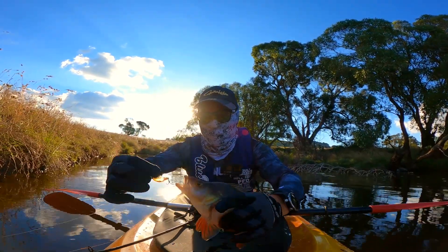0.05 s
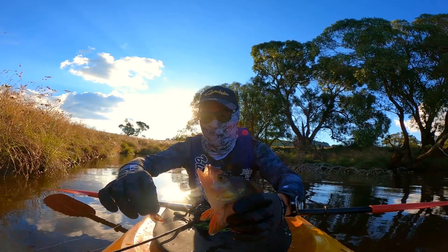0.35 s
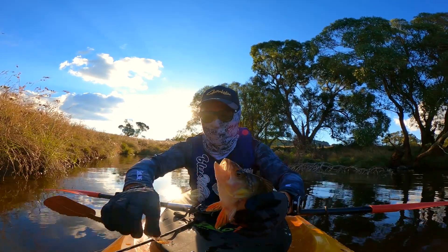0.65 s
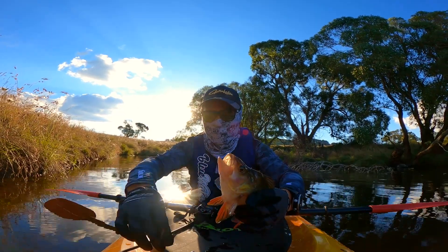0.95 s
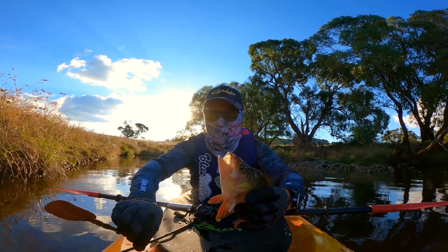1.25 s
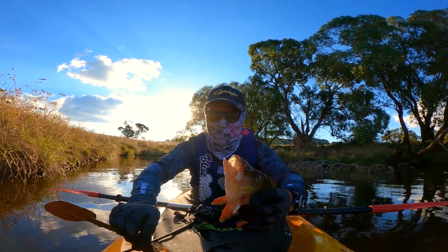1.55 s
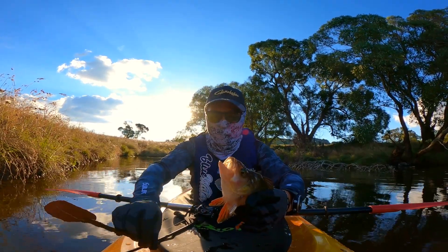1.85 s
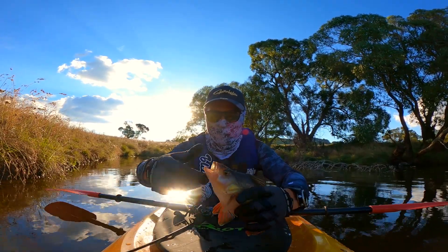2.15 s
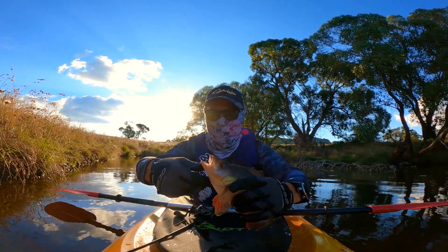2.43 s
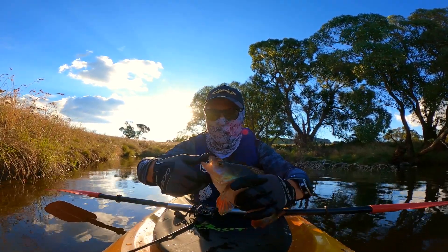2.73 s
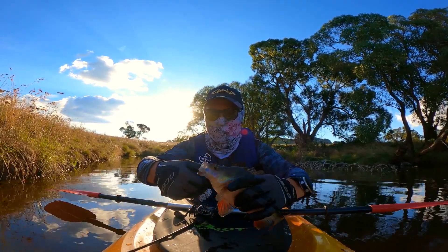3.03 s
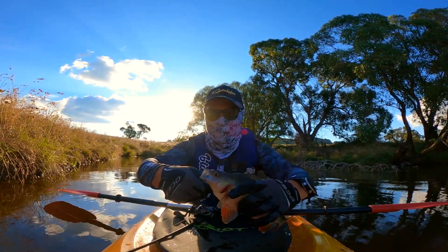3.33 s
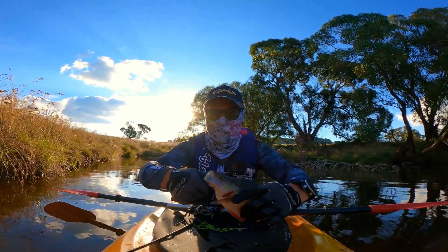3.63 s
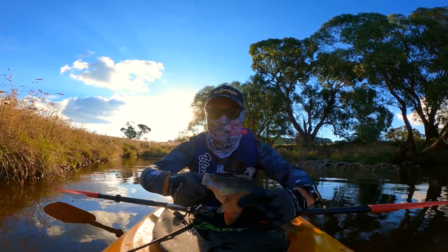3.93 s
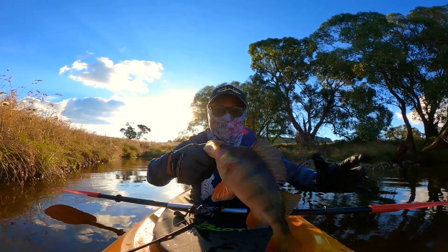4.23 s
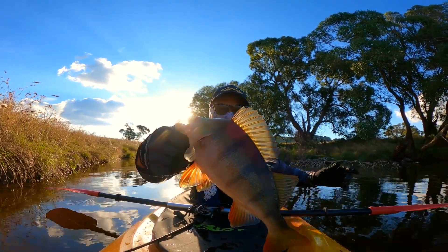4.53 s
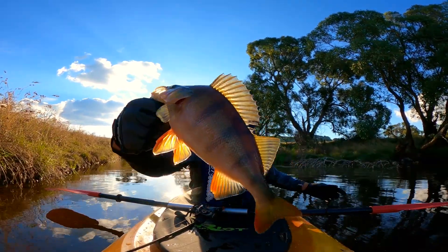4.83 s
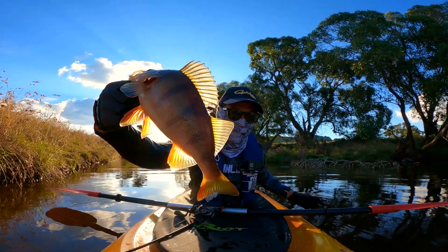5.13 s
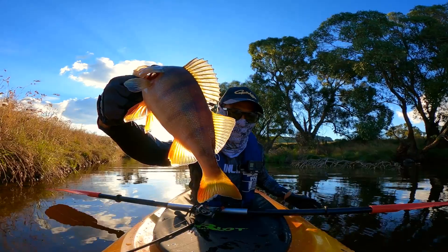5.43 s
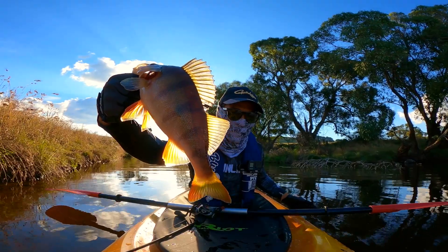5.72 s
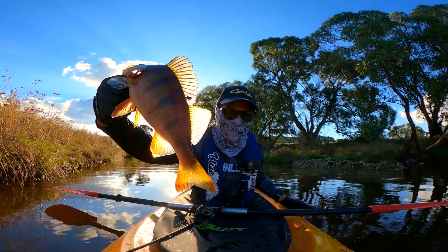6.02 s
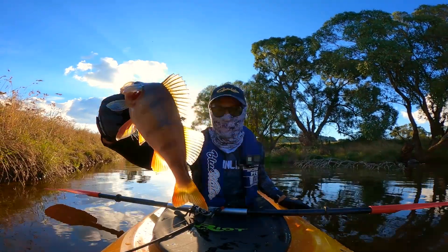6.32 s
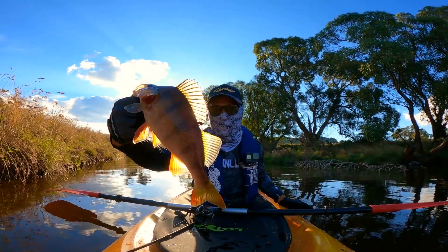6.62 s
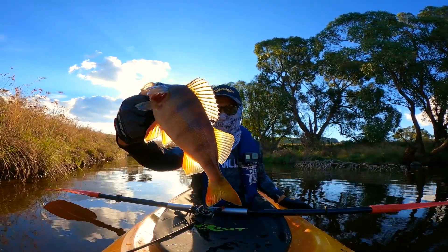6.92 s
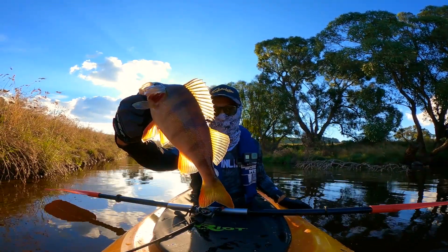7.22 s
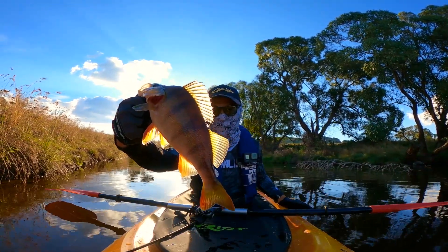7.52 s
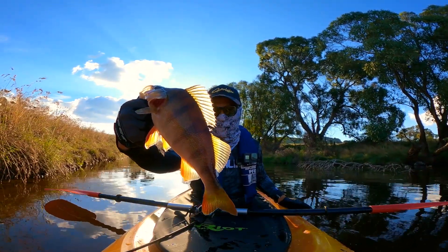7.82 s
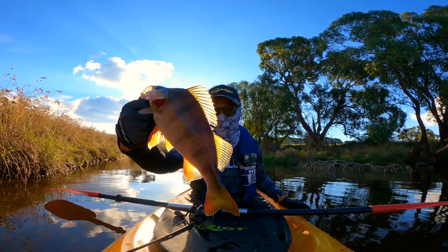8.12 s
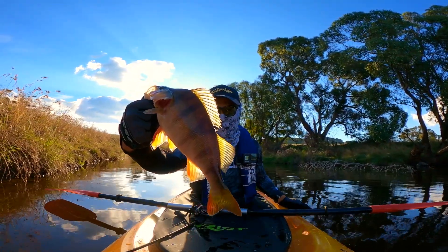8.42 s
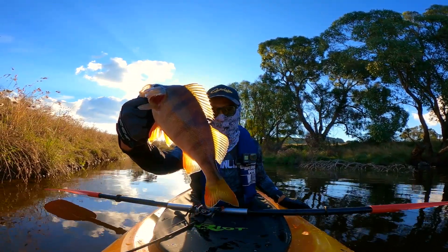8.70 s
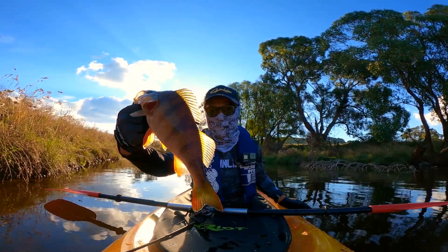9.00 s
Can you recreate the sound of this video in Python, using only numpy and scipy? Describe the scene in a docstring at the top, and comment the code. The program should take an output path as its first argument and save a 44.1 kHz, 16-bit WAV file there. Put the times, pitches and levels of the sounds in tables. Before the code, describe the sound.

An angler unhooks a fish in a plastic kayak, heard from close up. Small tackle ticks and wet glove rubs lead into a sharp, ringing clatter of pliers on the hull. After some faint squeaks, the fish slaps the deck with a deep hollow thump. The rest is quiet: cloth rustle and soft bumps. Thin, rising insect trills and a faint rumble continue outdoors throughout.

```python
"""On a still creek, insects trill in rising phrases over a low distant rumble, from start to end.
An angler in a plastic kayak sorts the tackle: hooks tick, and wet gloves scrape and squeak.
Just after one second, pliers bounce on the hollow hull and set it ringing.
Near four seconds the fish being unhooked kicks, slapping and thumping the boat; a glove groans on it.
Sleeves rustle as the fish is held up, and a few more soft bumps come near the end."""
import sys
import numpy as np
from scipy import signal
from scipy.fft import rfft, irfft, next_fast_len
from scipy.io import wavfile
from scipy.ndimage import map_coordinates

SR = 44100
rng = np.random.default_rng(int(sys.argv[2]) if len(sys.argv) > 2 else 0)


def digitize_waveform(pressure):
    """Quantize a signal to 16-bit integers and store it at the path in sys.argv[1].

    Rows of a 2-D input are taken as channels; values are limited to [-1, 1].
    """
    field = np.atleast_2d(pressure).T
    bounded = np.clip(field, -1, 1)
    quanta = np.round(bounded * 32767).astype(np.int16)
    wavfile.write(sys.argv[1], SR, quanta)


N = 399546
TIME = np.arange(N) / SR

# the open air: (time [s], rumble level [dB], insect chorus level [dB])
AIR_LEVELS = [(0, -63.5, -59), (1.2, -60.5, -57.5), (2.1, -66.5, -65.5), (3.5, -67, -63), (4.9, -66, -63),
              (5.6, -63, -59.5), (6.4, -63, -61.5), (7.8, -62.5, -59), (9.06, -61, -60)]
# the tone of a wet rub or snap: (frequency [Hz], level [dB])
WET_TONE = [(100, -15), (400, -6.5), (750, -12.5), (1200, -0.5), (1900, -0.5), (2700, -0.5), (4500, -8),
            (6500, -11), (10000, -20), (15000, -35.5)]
# pliers hit the hull: (time [s], level [dB], bass [dB], treble [dB], pitch [Hz], loss per bounce [dB])
PLIER_KNOCKS = [(1.2771, 6.5, 0, 4.5, 4473, 26), (1.2965, 7.5, -5, 2, 1775, 19),
                (1.3026, 6.5, 6.5, -1.5, 3760, 9), (1.3098, 1, 6, -12, 1470, 7.5),
                (1.4055, 6, 2.5, 6, 3720, 30), (1.4314, 6.5, 5.5, 4.5, 1770, 14.5),
                (1.5299, 0, 2, 3, 2413, 10.5), (1.5447, -1, 1, -3, 3560, 9), (1.7017, 1, 3, 7, 3720, 14),
                (1.7146, -2, 5.5, -2, 2030, 16.5), (1.7229, 7.5, -1, -16.5, 1190, 28.5),
                (1.7629, 9, -4, -8.5, 2790, 31.5), (1.7682, 8.5, -6.5, -16, 1730, 32.5),
                (1.8322, 5.5, -5, -21, 1700, 32)]


def amp(db):
    """Turn decibels into a number to multiply by."""
    return 10 ** (np.asarray(db) / 20)


def unit(x):
    """Scale a sound to an average (rms) size of 1."""
    return x / np.sqrt(np.mean(x ** 2) + 1e-20)


def along(points, hz):
    """Read between (frequency, value) points, with every octave equally wide."""
    freqs, values = np.transpose(points)
    return np.interp(np.log(hz + 1), np.log(freqs), values)


def air_gain(column):
    """Gain over time for the rumble (column 1) or the insect chorus (column 2)."""
    rows = np.array(AIR_LEVELS)
    return amp(np.interp(TIME, rows[:, 0], rows[:, column], left=-120, right=-120))


def wobble(rate):
    """A smooth random curve that takes `rate` new values a second."""
    return map_coordinates(rng.standard_normal(int(N * rate / SR) + 4), [TIME * rate])


def swells(rows):
    """Bell-shaped rises in gain, from rows of (time [s], level [dB], half length [s])."""
    s, db, half = np.transpose(rows)
    grid = TIME[::64, None]
    bells = amp(db) * np.exp(-.5 * ((grid - s) / half) ** 2)
    return np.interp(TIME, grid[:, 0], bells.sum(axis=1))


def colour(x, gain_db):
    """Change the tone of x by gain_db(frequency)."""
    n = x.shape[-1]
    size = 2 * next_fast_len(n // 2 + 2048)
    cepstrum = irfft(np.log(amp(gain_db(np.fft.rfftfreq(size, 1 / SR)))))
    # this fold makes the filter ring only after a sound, never before it
    cepstrum[1:size // 2] *= 2
    cepstrum[size // 2 + 1:] = 0
    return irfft(rfft(x, size) * np.exp(rfft(cepstrum)), size)[..., :n]


def shape(x, tone):
    """Give x a tone listed as (frequency [Hz], level [dB])."""
    return colour(x, lambda hz: along(tone, hz))


def spread(pair, side_db):
    """Two unrelated signals become the centre and the width of a stereo sound."""
    side = amp(side_db) * pair[1]
    return np.array([pair[0] + side, pair[0] - side])


def add(out, s, x):
    """Mix x into out, starting at s seconds."""
    i = round(s * SR)
    x = x[..., max(-i, 0):max(N - i, 0)]
    out[:, max(i, 0):max(i, 0) + x.shape[-1]] += x


def hiss(tone):
    """Outdoor noise, more alike in the two ears at low pitches than at the very top."""
    # (frequency [Hz], left-right likeness [0 to 1])
    likeness = [(60, 0.74), (130, 0.6), (290, 0.69), (640, 0.51), (1410, 0.72), (3100, 0.47), (6820, 0.04),
                (15000, 0.1)]
    centre, width = rng.standard_normal((2, N))
    width = colour(width, lambda hz: 10 * np.log10((1 - along(likeness, hz)) / (1 + along(likeness, hz))))
    return unit(shape(spread([centre, width], 0), tone))


def friction(tone, grit_db, side_db):
    """Rubbing noise: countless tiny slips of uneven strength."""
    slips = rng.standard_normal((2, N)) * amp(grit_db * wobble(700) + 1.5 * wobble(60))
    return unit(shape(spread(slips, side_db), tone))


def creek(rumble_db=2.5, breeze_db=-72, rocking_db=-77):
    """Distant rumble and faint hiss of the open air, and the boat's slow rocking."""
    # three tones: (frequency [Hz], level [dB])
    rumble_tone = [(20, -14), (55, -8), (95, -27), (140, 3), (230, 3.5), (330, -8), (480, -15.5),
                   (750, -27), (1200, -25.5), (2500, -39.5), (8000, -71.5)]
    breeze_tone = [(300, -11.5), (750, -7.5), (1250, 1.5), (2000, -6.5), (3500, -10.5), (6500, -10.5),
                   (10000, -31), (13500, -14), (16000, -17.5)]
    boat_tone = [(15, -4.5), (30, -2), (50, -1.5), (90, -19.5), (300, -60.5), (1000, -100)]
    # the boat lurches as the weight shifts: (time [s], level [dB], half length [s])
    lurches = [(2.3, -67, .25), (3.15, -60.5, 0.046), (3.31, -52.5, 0.04), (3.53, -58, .04),
               (3.85, -42, 0.13), (4.52, -60, 0.046), (4.92, -53, 0.032)]
    rumble = air_gain(1) * amp(rumble_db + 1.2 * wobble(5)) * hiss(rumble_tone)
    breeze = amp(breeze_db + .5 * wobble(4.9)) * hiss(breeze_tone)
    rocking = amp(rocking_db + 3 * wobble(4.1)) + swells(lurches)
    return rumble + breeze + rocking * friction(boat_tone, grit_db=1, side_db=-20.5)


def trill(length_s, first_hz, last_hz, period_s=.0363, rise_hz=750, fall_hz=1400, sounding_share=.45):
    """One insect's run of chirps: each wing stroke arches in pitch, and the whole run climbs."""
    t = np.arange(int((length_s + period_s) * SR)) / SR
    stroke, within = np.divmod(t / period_s, 1)
    within = np.minimum(within / sounding_share, 1)  # 0 to 1 through each chirp
    chance = rng.standard_normal((32, 2))[stroke.astype(int)]
    progress = np.minimum(stroke * period_s / length_s, 1)
    arch = np.where(within < .5, rise_hz, fall_hz) * (2 * within - 1) ** 2 * (.45 + .86 * progress)
    hz = first_hz + (last_hz - first_hz) * np.sin(np.pi / 2 * progress) - arch + 45 * chance[:, 0]
    loudness = amp(.39 * chance[:, 1] - 1.8 * (stroke == 0)) * np.abs(np.sin(np.pi * within)) ** .5
    fade = np.clip((t[-1] - t) / .005, 0, 1)
    return fade * loudness * np.sin(2 * np.pi * np.cumsum(hz) / SR)


def insects(ceiling_hz=9010, climb_share=.44, echo_db=-12, far_db=-2, wash_db=-7.5, far_count=110):
    """Near phrases, a crowd of far ones from all sides, and their blur among the reeds."""
    # near phrases: (time [s], level [dB], first pitch [Hz])
    phrases = [(-.146, -46, 7630), (0.325, -47, 7720), (0.751, -49, 7540), (.92, -60, 8400),
               (1.206, -51, 7500), (1.714, -52.5, 7430), (2.19, -59.5, 7500), (2.69, -58, 7600),
               (3.61, -56.5, 7400), (4.074, -55.5, 7600), (4.58, -54, 7510), (4.9, -60, 8360),
               (5.046, -53, 7500), (5.509, -53, 7570), (6.011, -50.5, 7540), (6.026, -60.5, 8550),
               (6.469, -50.5, 7500), (6.94, -50, 7380), (7.159, -64.5, 8130), (7.473, -50, 7360),
               (7.98, -50.5, 7460), (8.141, -56, 8450), (8.48, -50, 7360), (8.938, -49, 7550)]
    # the blurred chorus: (frequency [Hz], level [dB])
    chorus_tone = [(5500, -51), (6800, -19.5), (7450, -1), (8200, -5), (8700, -10), (9300, -31.5),
                   (11000, -60)]
    near, far = np.zeros((2, N)), np.zeros((2, N))
    for s, db, first_hz in phrases:
        song = amp(db) * trill(.22, first_hz, first_hz + climb_share * (ceiling_hz - first_hz))
        add(near, s, np.array([np.roll(song, 1), song]))
    for k, (jitter, pitch, side) in enumerate(rng.uniform(-1, 1, (far_count, 3))):
        song = trill(.29, 7650 + 300 * pitch, 8300 + 300 * pitch)
        add(far, (k + jitter - .5) * N / SR / far_count, np.array([np.roll(song, round(3 * side)), song]))
    direct = near + air_gain(2) * amp(far_db) * unit(far)
    t = np.arange(SR // 4) / SR
    tail = rng.standard_normal((2, len(t))) * amp(-60 * t / .073)
    echo = signal.fftconvolve(direct, tail / np.linalg.norm(tail[0]), axes=1)[:, :N]
    return direct + amp(echo_db) * echo + amp(wash_db) * air_gain(2) * hiss(chorus_tone)


def thumps(puff_db=3.5, even_swell_s=.013, softening_db=5, lag_s=.00077):
    """Soft blows swell into the hollow hull's deepest notes, with a dull puff."""
    # (time [s], level [dB], swell time [s])
    blows = [(0.01, -51, 0.016), (0.301, -53.5, 0.023), (1.305, -44, 0.0022), (1.438, -29, 0.014),
             (1.46, -34, 0.0039), (1.726, -40, 0.006), (1.94, -42.5, 0.029), (2.668, -54.5, 0.0047),
             (3.626, -26.5, 0.01), (3.779, -16, 0.013), (3.857, -38, 0.0058), (4.519, -47.5, 0.014),
             (4.93, -65, 0.042), (7.059, -40, .025), (7.797, -32.5, 0.035)]
    # (pitch [Hz], level [dB], time to fade by 60 dB [s])
    hull_notes = [(78.4, -0.5, .19), (120, -10, .22), (159, -11, .18), (205, -12, 0.11), (265, -21, 0.064)]
    # (frequency [Hz], level [dB])
    puff_tone = [(40, -3), (220, 2), (480, -10), (850, -18), (1600, -26), (5000, -57)]
    out, t = np.zeros((2, N)), np.arange(-SR // 5, SR // 2) / SR
    for s, db, swell in blows:
        overtone_db = -softening_db * np.log2(swell / even_swell_s)  # slower blows sound duller
        rise, after = np.exp(np.minimum(t, 0) / swell), np.maximum(t, 0)
        deep, *upper = [-amp(note_db - 60 * after / fade_s)
                        * np.sin(2 * np.pi * hz * rng.normal(1, .019) * t)
                        for hz, note_db, fade_s in hull_notes]
        ring = deep + amp(overtone_db) * sum(upper) * np.array([[1.15], [.85]])
        ring[1] = np.roll(ring[1], round(lag_s * SR))  # the hull's two sides swing slightly out of step
        noise = spread(rng.standard_normal((2, len(t))), side_db=-9)
        puff = shape(noise * rise * amp(puff_db + overtone_db - 60 * after / .09), puff_tone)
        add(out, s + t[0], amp(db) * (rise * ring + puff))
    return out


def gloves(skid_delay_s=.024, skid_half_s=.0091, skid_db=-38.5):
    """Wet gloves scrape on fish and gear; bouncing pliers skid a little."""
    # (time [s], level [dB], half length [s], extra bright edge [dB])
    strokes = [(0.025, -49, 0.028, -1), (0.125, -63, .007, 7.5), (0.2, -61.5, 0.048, -1),
               (0.488, -72.5, 0.2, -6), (0.821, -61.5, 0.015, 9), (0.893, -50.5, .012, 11),
               (0.94, -62, 0.021, 0.5), (1.225, -65, 0.057, 6.5), (1.385, -49, .02, 0),
               (1.48, -64, 0.062, 3), (1.663, -52.5, .03, 1), (2.616, -79.5, .05, 8.5),
               (3.433, -69.5, 0.032, 10.5), (3.557, -58, 0.031, 0), (3.63, -43.5, 0.015, -9),
               (3.71, -44.5, 0.021, -13), (3.778, -47, 0.02, -4), (3.852, -64, 0.04, -10),
               (4.117, -60.5, 0.027, -18), (6.777, -76, 0.055, 10)]
    rub = friction(WET_TONE, grit_db=4, side_db=-9)
    edge = shape(rub, [(1500, -30), (4000, 2.5), (12000, -1)])
    rub_gain = swells([(s, db, half) for s, db, half, _ in strokes])
    edge_gain = swells([(s, db + edge_db, half) for s, db, half, edge_db in strokes])
    skid_gain = swells([(s + skid_delay_s, db - loss_db + skid_db, skid_half_s)
                        for s, db, *_, loss_db in PLIER_KNOCKS])
    return (rub_gain + skid_gain) * rub + edge_gain * edge[:, ::-1]


def tackle(fade_s=.014, overtone_db=-17, roughness=.03, faint_db=-59, faint_hz=3800, faint_count=16):
    """Hook, line and drops give short pitched ticks, with fainter ones as the tackle is sorted."""
    # (time [s], level [dB], pitch [Hz])
    ticks = [(0.0541, -40, 1620), (0.1345, -38.5, 2080), (0.2515, -49.5, 2620), (0.3694, -40, 1772),
             (1.153, -55, 3280), (1.206, -44, 3452), (1.234, -43, 4500), (1.655, -33.5, 1288),
             (2.6108, -52, 1380), (3.396, -48, 1930), (3.475, -45.5, 1830), (3.6208, -32.5, 2074),
             (3.7228, -31, 1746), (3.7494, -35, 1850), (3.7635, -31.5, 2106), (3.9918, -54, 1840),
             (5.074, -56, 2010), (5.3976, -55, 5500), (5.904, -52.5, 1625)]
    out, t = np.zeros((2, N)), np.arange(SR // 20) / SR
    faint = [(.05 + 1.05 * when, faint_db + 8 * (force - .5), faint_hz * 2 ** (2 * pitch - 1))
             for when, force, pitch in rng.random((faint_count, 3))]
    for s, db, pitch_hz in ticks + faint:
        snap = shape(spread(rng.standard_normal((2, len(t))), side_db=-10.5), WET_TONE)
        phase = 2 * np.pi * pitch_hz * t + roughness * np.cumsum(rng.standard_normal(len(t)))
        ring = np.sin(phase) + amp(overtone_db) * np.sin(2.2 * phase)
        add(out, s, amp(db) * (ring + snap) * amp(-60 * t / fade_s))
    return out


def squeaks(flutter_db=5):
    """Rubbed wet surfaces sing briefly on an unsteady pitch; the harder the rub, the rougher."""
    # (time [s], length [s], level [dB], first pitch [Hz], last pitch [Hz])
    rubs = [(0.146, .11, -60.5, 554, 583), (3.379, 0.13, -60.5, 1807, 1930),
            (3.526, 0.069, -56, 1910, 2075), (3.834, 0.024, -59.5, 1287, 1140),
            (7.001, 0.03, -65.5, 777, 774), (7.655, 0.23, -68, 1334, 1120), (7.747, 0.041, -61.5, 772, 770)]
    out = np.zeros(N)
    for s, length, db, first_hz, last_hz in rubs:
        progress = np.clip((TIME - s) / length, 0, 1)
        roughness = np.interp(db, [-67, -55], [.04, .13])
        hz = (first_hz + (last_hz - first_hz) * progress ** 2) * (1 + roughness * wobble(1200))
        loudness = amp(db + flutter_db * wobble(250)) * np.sqrt(4 * progress * (1 - progress))
        out += loudness * np.sin(2 * np.pi * np.cumsum(hz) / SR)
    return out


def bounces(flight_s=.019, rest_db=-14):
    """Each knock of the pliers and up to two weaker bounces; below rest_db they lie still."""
    return [(s + k * flight_s, db - k * loss_db, bass_db, treble_db, hz)
            for s, db, bass_db, treble_db, hz, loss_db in PLIER_KNOCKS
            for k in range(3) if db - k * loss_db > rest_db]


def pliers(shell_db=-25, deck_db=-43, crack_db=-15.5, crack_fade_s=.0079, peak_db=3, peak_width=.22):
    """Each hit is a crack with its own pitch, then the noisy ring of the shell and the deck's notes."""
    # (pitch [Hz], level [dB], time to fade by 60 dB [s])
    deck_notes = [(112, 6, 0.27), (160, 5.5, .28), (200.6, 2.5, 0.19), (280, -9, 0.15), (355, -2, 0.24),
                  (432, -5, 0.25), (511.3, 1.5, 0.21), (688, -0.5, .1), (872, -1.5, 0.067), (972, -3, 0.14),
                  (1235, -2, .06), (1510, -6.5, 0.097), (1895, -5, 0.076)]
    # (frequency [Hz], time to fade by 60 dB [s])
    shell_fade = [(100, 0.27), (250, .2), (500, .11), (1200, 0.07), (3000, 0.046), (9000, .04)]
    # tones of the whole hit and of the shell: (frequency [Hz], level [dB])
    hit_tone = [(60, -15.5), (300, -7.5), (900, 0), (1900, -2), (2600, 0), (3100, -4), (4300, 0.5),
                (5500, -5), (6600, -10.5), (7800, -7), (10000, -24.5), (15000, -37.5)]
    shell_tone = [(200, 4.5), (500, 1.5), (900, 1), (2500, -4.5), (6000, -11.5)]
    # the knocks have a slightly different tone in each ear: (frequency [Hz], left minus right [dB])
    balance = [(60, 2), (110, 5), (200, 4), (380, -1.5), (700, -5), (1290, -0.5), (2380, 2.5), (4400, -2.5),
               (8100, -5.5)]
    out, t = np.zeros((2, N)), np.arange(SR // 3) / SR
    note_hz, note_db, fade_s = np.transpose(deck_notes)[:, :, None]
    per_note = (2, len(deck_notes), 1)
    for s, db, bass_db, treble_db, pitch_hz in bounces():
        # split noise into bands and let each fade at its own speed
        freqs, times, bands = signal.stft(rng.standard_normal((2, len(t))), SR, nperseg=128)
        fading = amp(-60 * times / along(shell_fade, freqs)[:, None] + along(shell_tone, freqs)[:, None])
        shell = signal.istft(bands * fading, SR, nperseg=128)[1][:, :len(t)]
        strengths = amp(note_db + rng.normal(0, 2.5, per_note)) * rng.choice([-1, 1], per_note)
        deck = np.sum(strengths * amp(-60 * t / fade_s) * np.sin(2 * np.pi * note_hz * t), axis=1)
        crack = rng.standard_normal((2, len(t))) * amp(crack_db - 60 * t / crack_fade_s)
        hit = spread(crack + amp(shell_db) * shell + amp(deck_db) * deck, side_db=-8)
        hit[:, 0] -= .8  # the first sharp click
        # high notes travel faster through the plastic, so they arrive first
        hit = signal.lfilter([.36, -1.2, 1], [1, -1.2, .36], hit)
        peak = lambda hz: peak_db / (1 + (np.log((hz + 1) / pitch_hz) / peak_width) ** 2)
        tilt = [(400, bass_db), (2200, 0), (10000, treble_db)]  # heavier is fuller, harder is brighter
        add(out, s, amp(db) * colour(hit, lambda hz: along(hit_tone, hz) + peak(hz) + along(tilt, hz)))
    return np.array([colour(ear, lambda hz: side * along(balance, hz))
                     for ear, side in zip(out, (.5, -.5))])


def slaps(splat_db=-14, fade_s=.019):
    """Flesh or cloth meets the deck: one dull push and a brief splat."""
    # (time [s], level [dB])
    hits = [(3.624, -6.5), (3.761, -5), (3.7763, 6.5), (3.988, -22), (7.699, -21), (7.761, -32)]
    # (frequency [Hz], level [dB])
    tone = [(60, -14), (230, 10), (500, 1), (1000, -12.5), (2000, -13.5), (5000, -24.5), (12000, -54)]
    out, t = np.zeros((2, N)), np.arange(SR // 8) / SR
    for s, db in hits:
        hit = spread(rng.standard_normal((2, len(t))), side_db=-26) * amp(splat_db - 60 * t / fade_s)
        hit[:, 0] += 1  # the push
        add(out, s, amp(db) * shape(hit, tone))
    return out


def sleeve():
    """Cloth rustles as the arm lifts and turns the fish."""
    # (time [s], level [dB], half length [s])
    arm_moves = [(4.08, -68.5, 0.11), (4.48, -65, 0.2), (5.02, -66, 0.15), (6.32, -65, .18),
                 (6.76, -70.5, 0.069), (6.98, -67.5, 0.047), (7.755, -61, 0.025)]
    # (frequency [Hz], level [dB])
    cloth_tone = [(200, 7), (750, -4), (1400, 1.5), (2200, -2.5), (4500, -3), (6500, -10.5), (10000, -23),
                  (15000, -27)]
    return swells(arm_moves) * friction(cloth_tone, grit_db=2, side_db=-17.5)


def groan(peak_s=4.128, half_s=.029, db=-34.5, held_hz=138, climb_hz_per_s=2000, roughness=.059):
    """The glove sticks and slips on the fish; the pitch holds, then climbs as the grip lets go."""
    grip = swells([(peak_s, 0, half_s)])
    hz = held_hz + climb_hz_per_s * np.clip(TIME - peak_s - .0063, 0, 2 * half_s)
    phase = 2 * np.pi * np.cumsum(hz * (1 + roughness * wobble(150))) / SR
    octave = .41 * grip ** 2 * np.sin(2 * phase)  # a firm grip brings it out
    return amp(db) * grip * (np.sin(phase) + octave)


def two_ears(x, lead_s=.00003):
    """Give each side a slightly different tone, and let the right hear it a little sooner."""
    # (frequency [Hz], left minus right [dB])
    balance = [(100, 0.5), (380, -2), (700, -3.5), (1290, -1), (2380, 1), (4400, -1), (8100, -0.5),
               (14000, 11)]
    size = next_fast_len(N + 2048)
    hz, side = np.fft.rfftfreq(size, 1 / SR), np.array([[.5], [-.5]])
    delay = np.exp(-2j * np.pi * hz * side * lead_s)
    return irfft(rfft(x, size) * amp(side * along(balance, hz)) * delay, size)[:, :N]


def scene():
    """Angler, boat, insects on the bank and background together."""
    angler = tackle() + squeaks() + slaps() + gloves() + groan()
    boat = pliers() + thumps()
    bank = insects() * amp([[.9], [-.9]])  # a little to the left
    return angler + boat + bank + two_ears(sleeve() + creek())


def record(dry):
    """Cut away the very highest treble."""
    top_hz = 15850
    size = next_fast_len(N + SR // 2)
    return irfft(rfft(dry, size) * (np.fft.rfftfreq(size, 1 / SR) < top_hz), size)[:, :N]


dry = scene()
out = record(dry)
digitize_waveform(out)
```